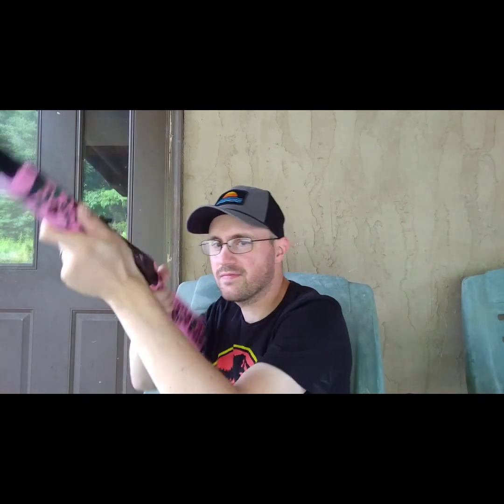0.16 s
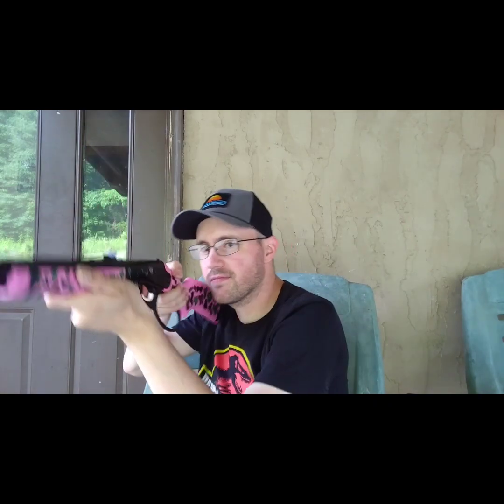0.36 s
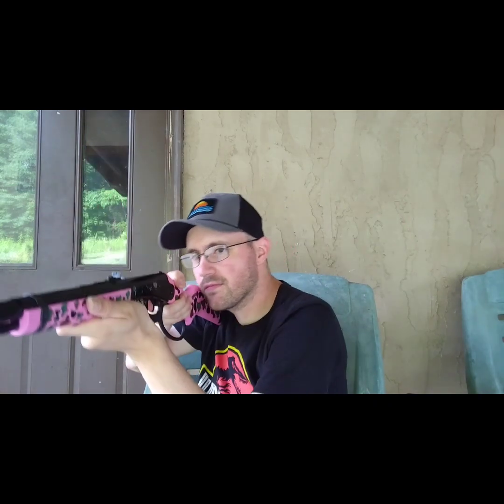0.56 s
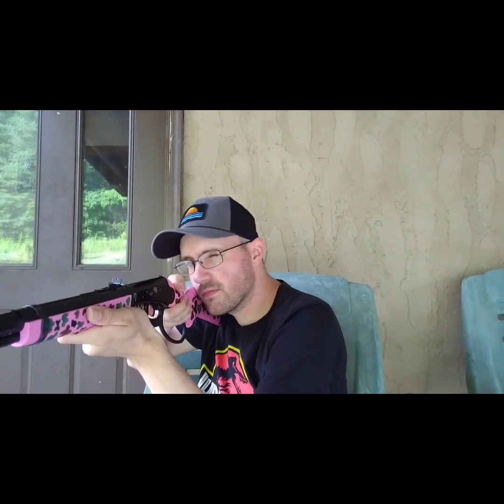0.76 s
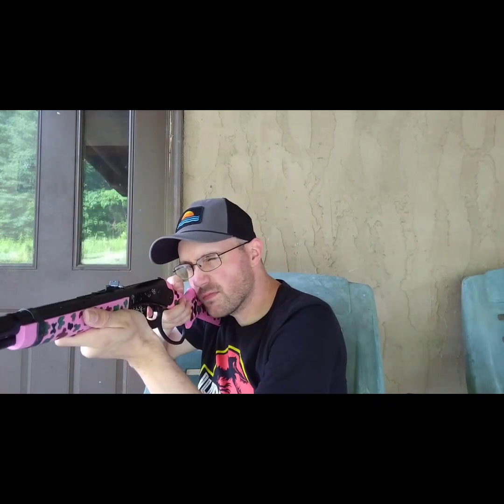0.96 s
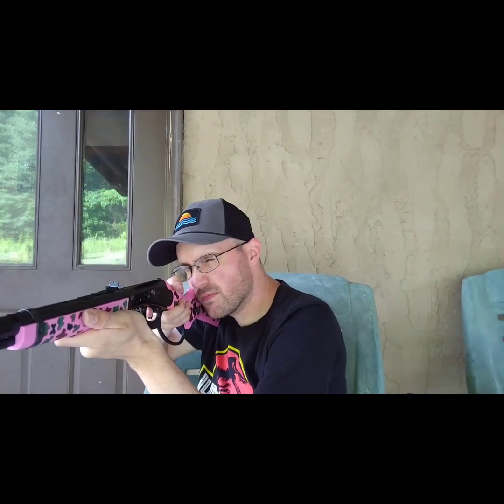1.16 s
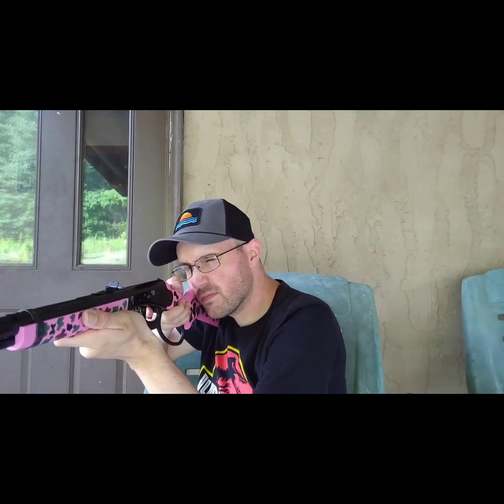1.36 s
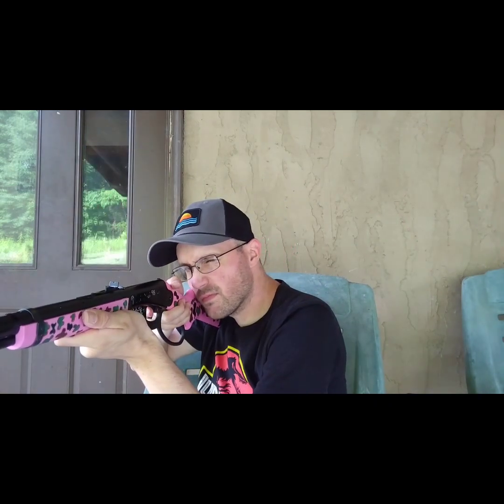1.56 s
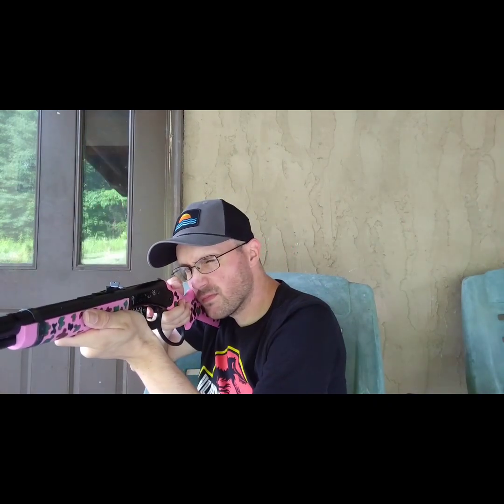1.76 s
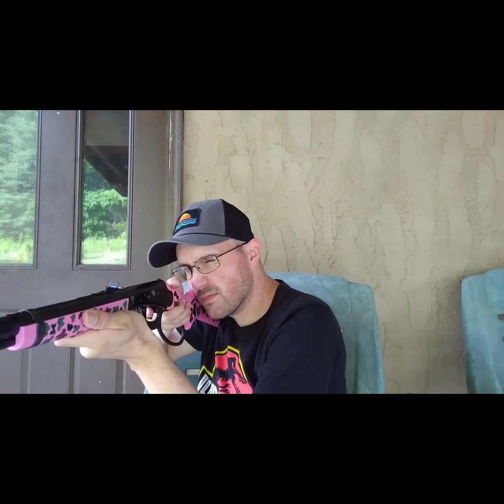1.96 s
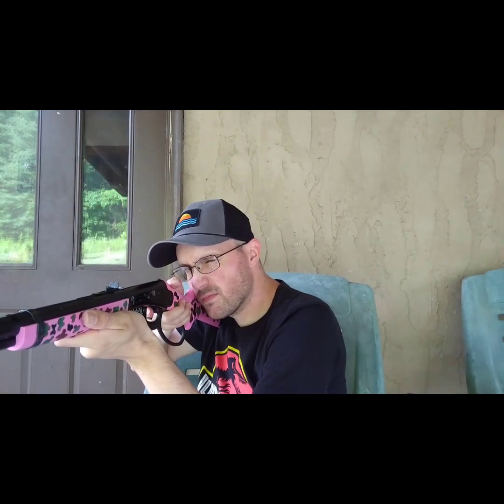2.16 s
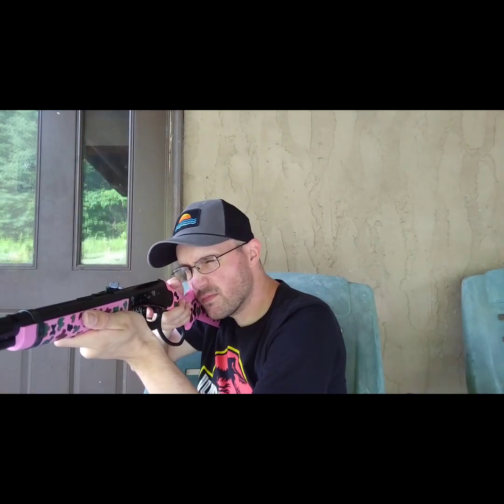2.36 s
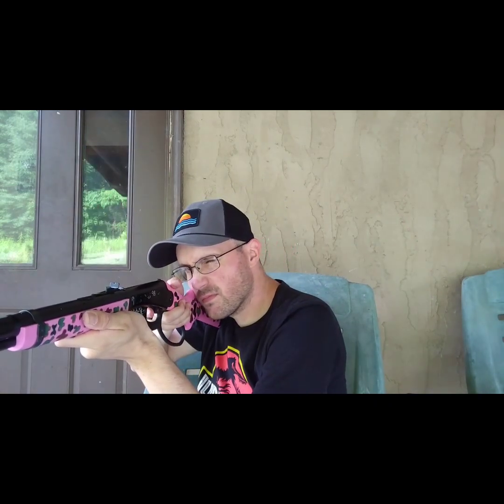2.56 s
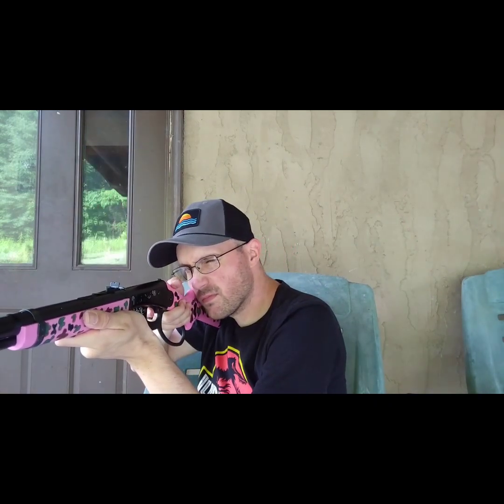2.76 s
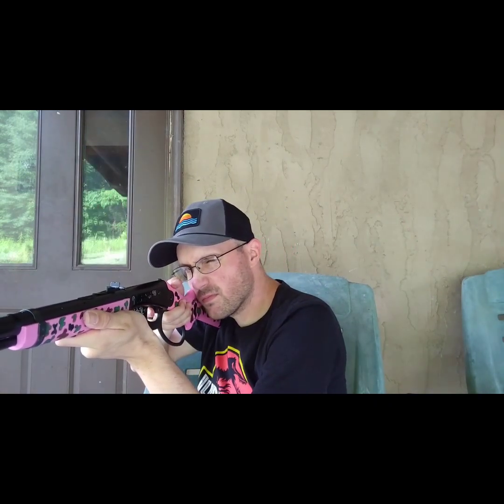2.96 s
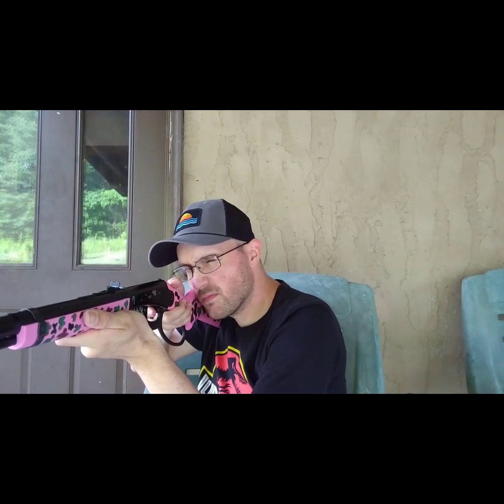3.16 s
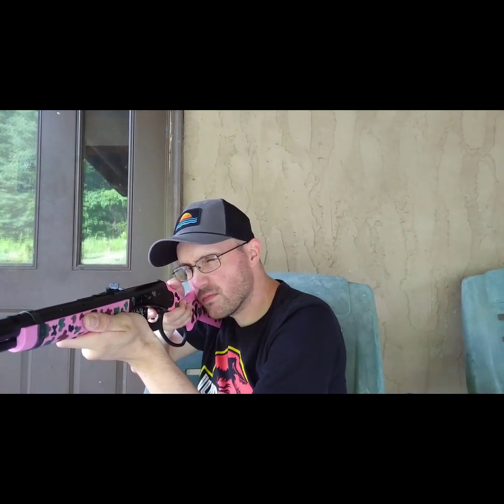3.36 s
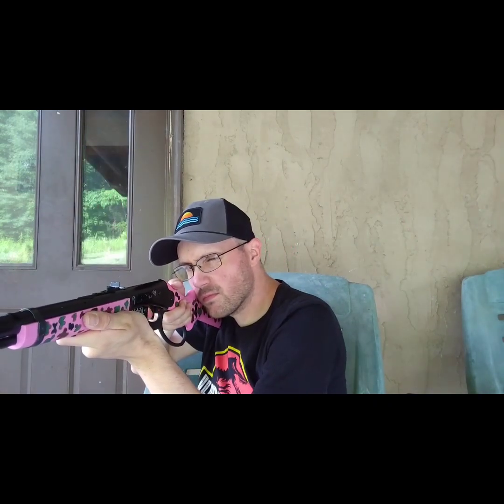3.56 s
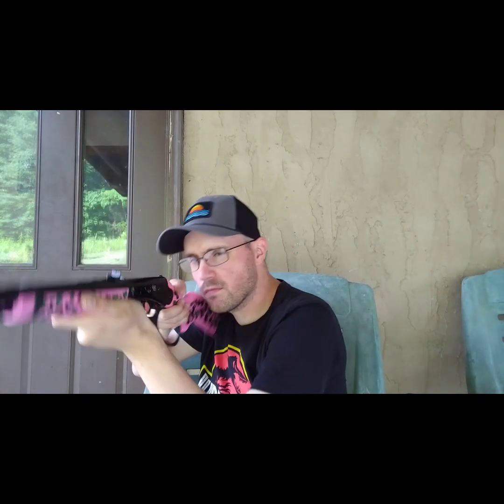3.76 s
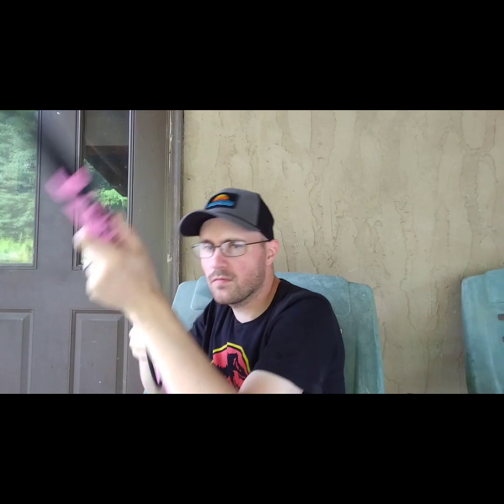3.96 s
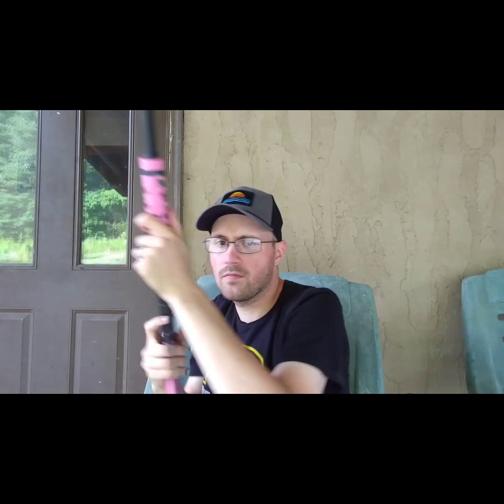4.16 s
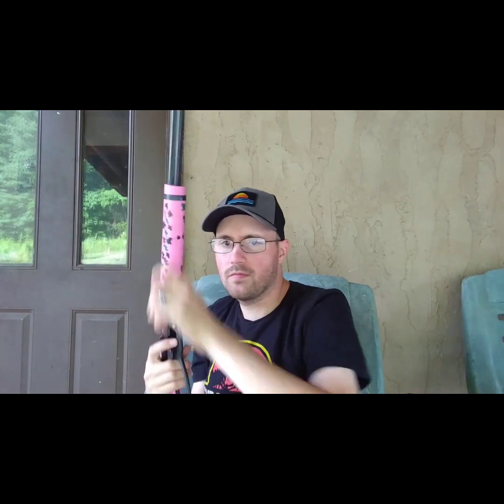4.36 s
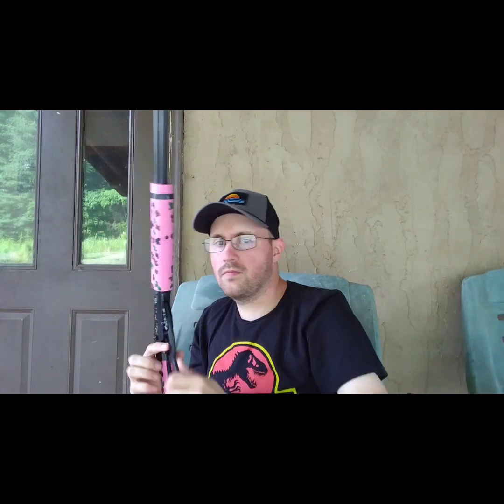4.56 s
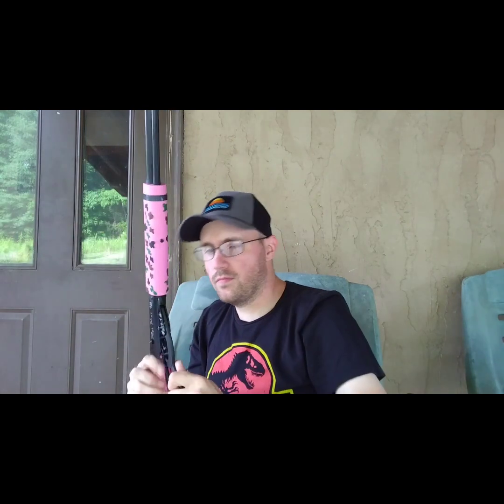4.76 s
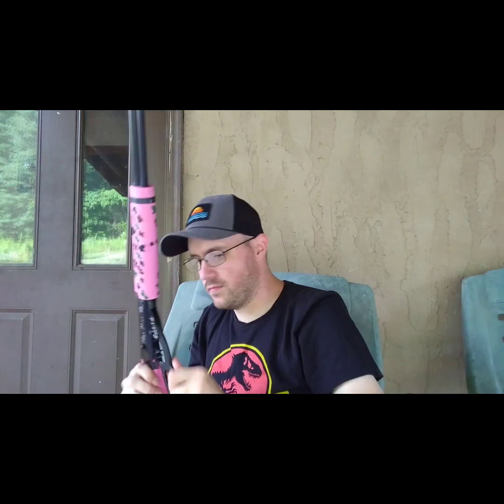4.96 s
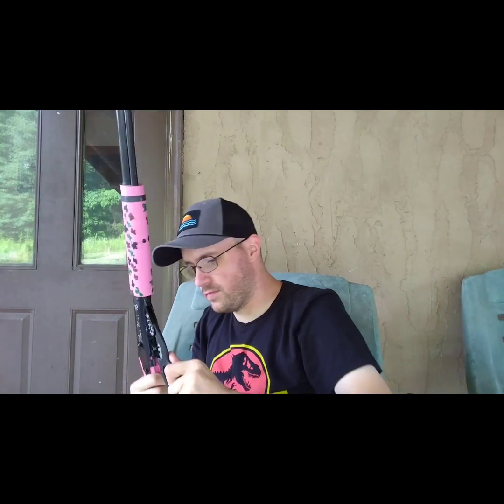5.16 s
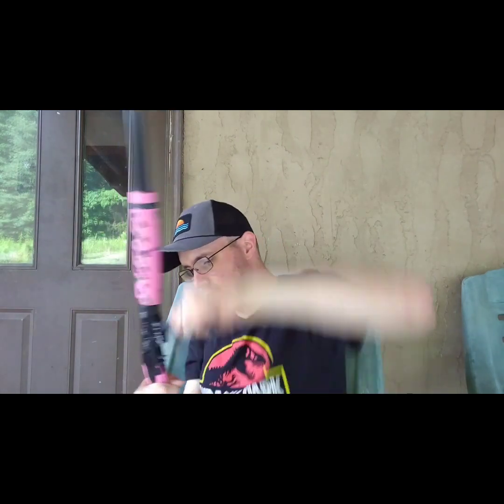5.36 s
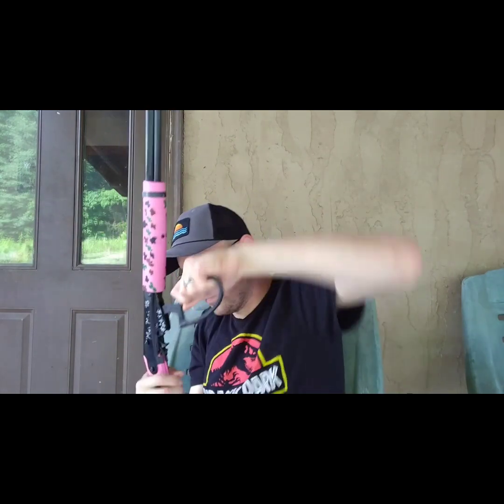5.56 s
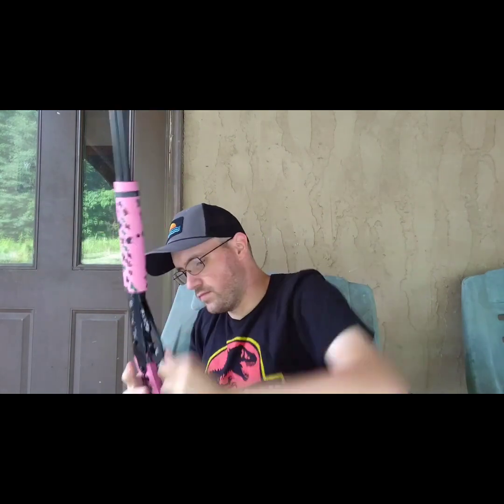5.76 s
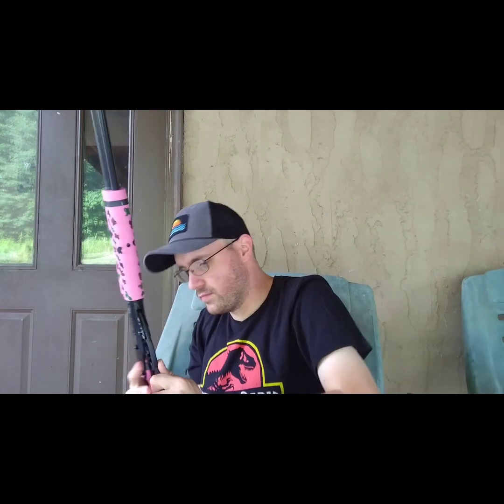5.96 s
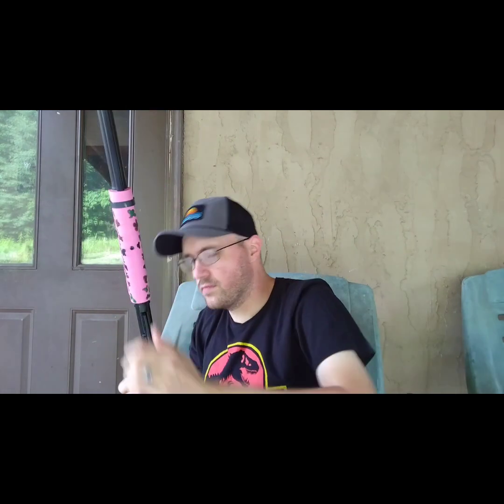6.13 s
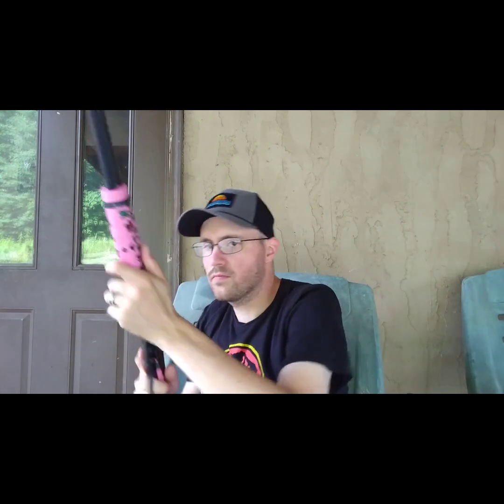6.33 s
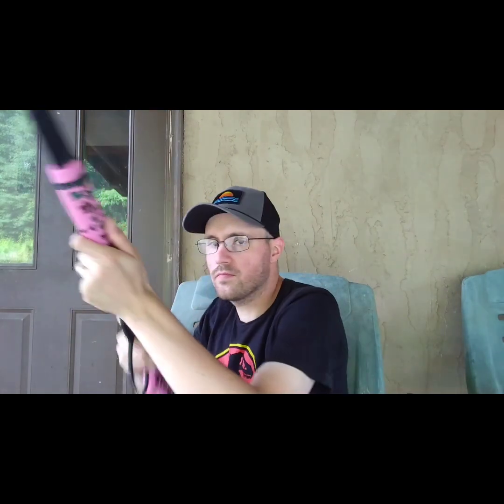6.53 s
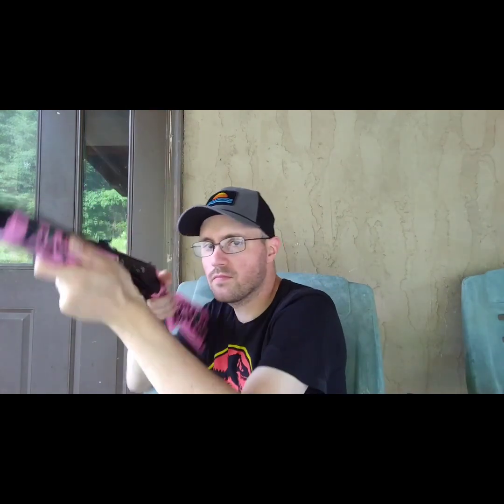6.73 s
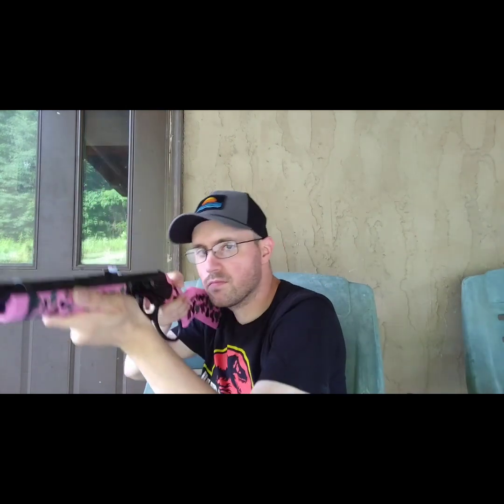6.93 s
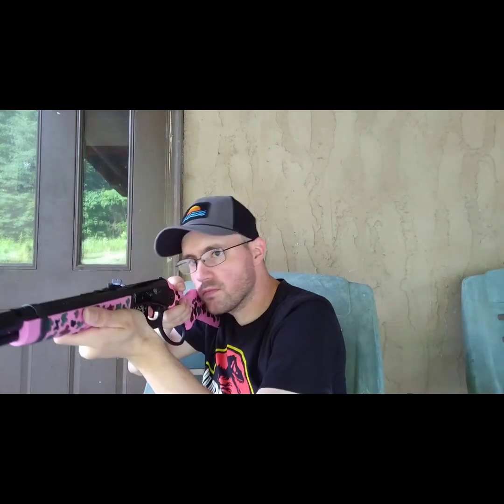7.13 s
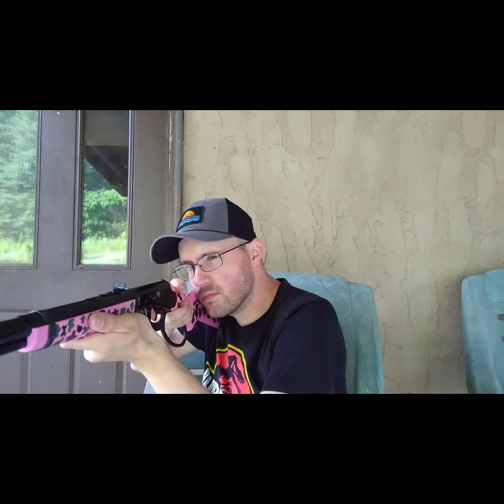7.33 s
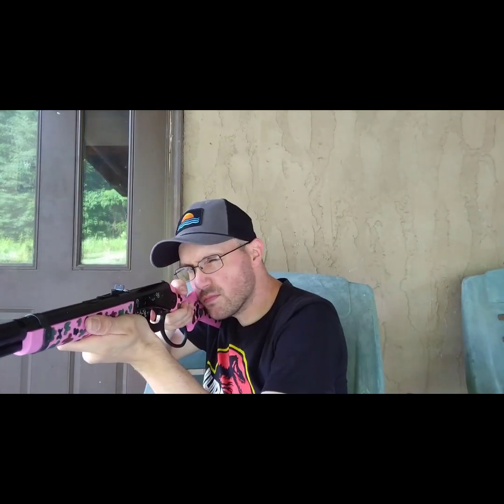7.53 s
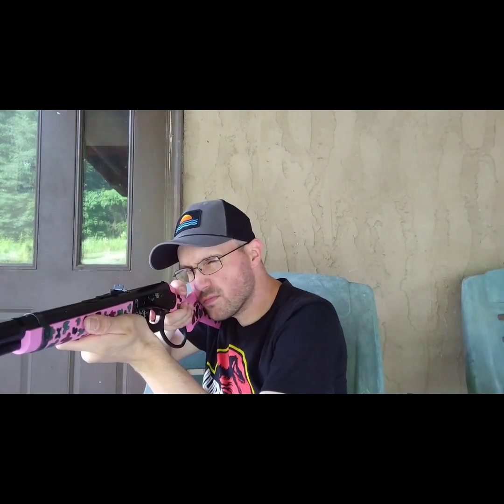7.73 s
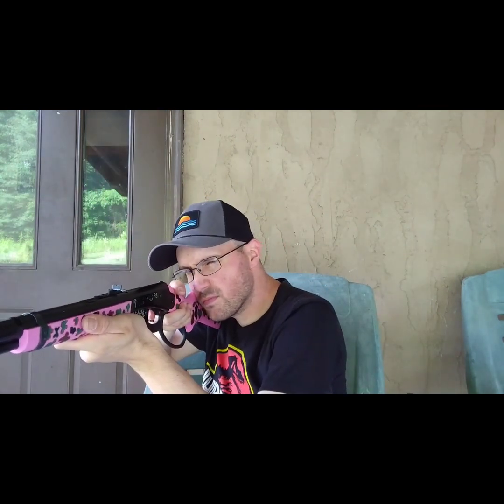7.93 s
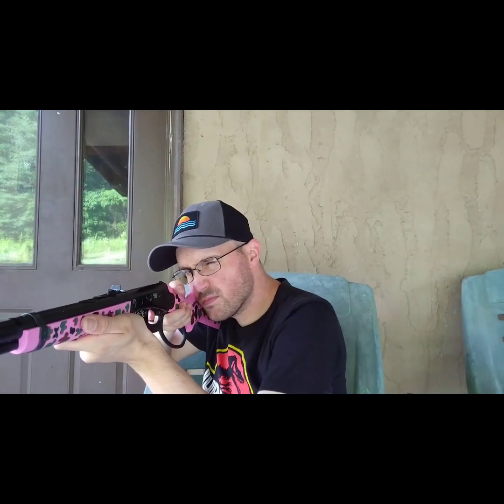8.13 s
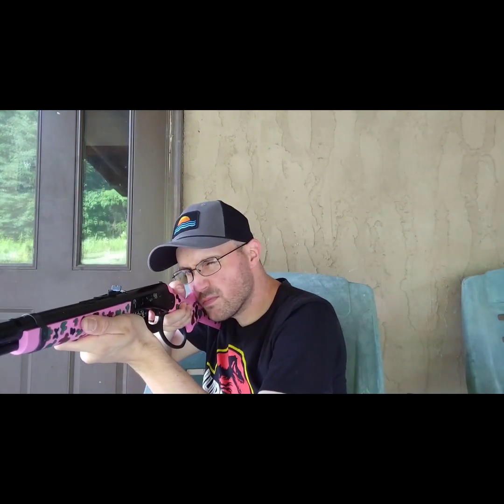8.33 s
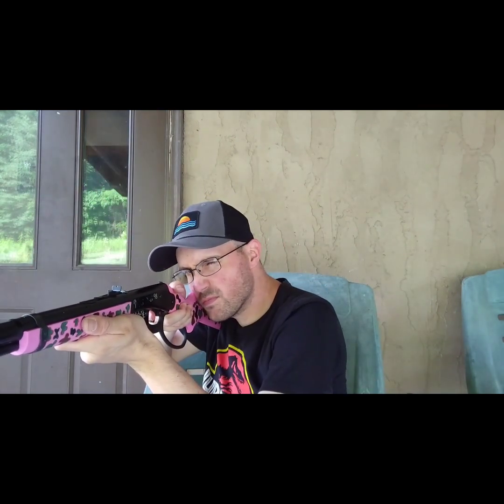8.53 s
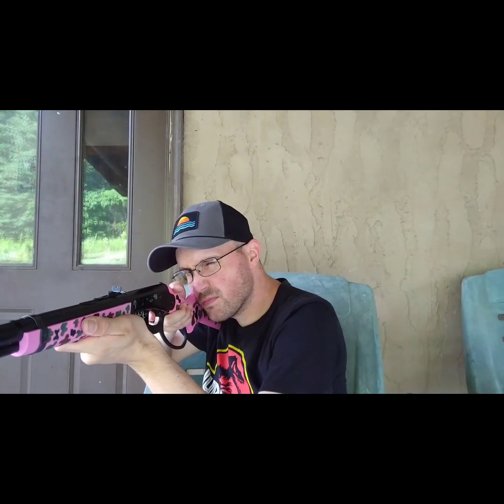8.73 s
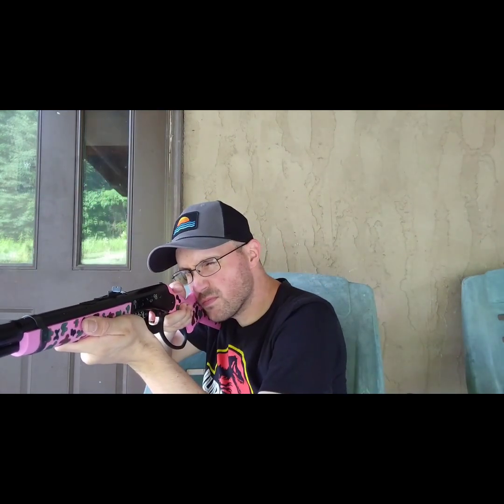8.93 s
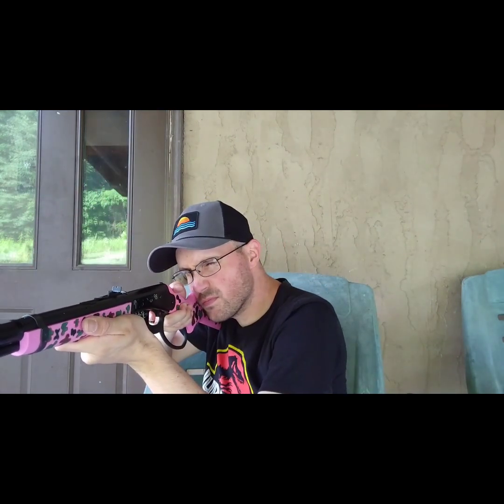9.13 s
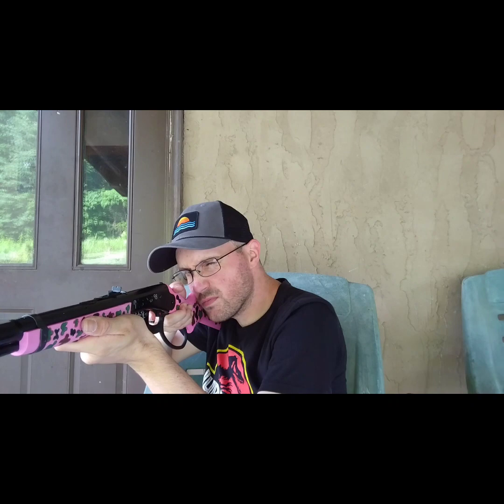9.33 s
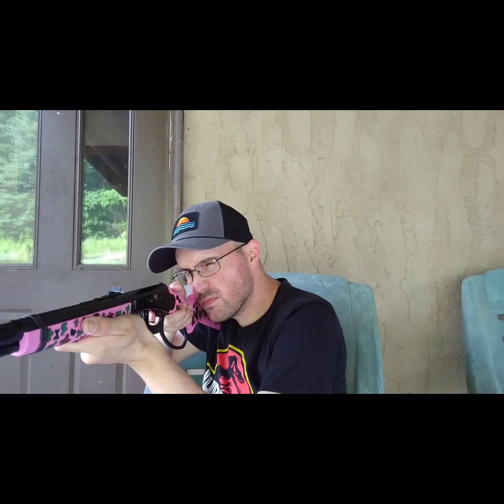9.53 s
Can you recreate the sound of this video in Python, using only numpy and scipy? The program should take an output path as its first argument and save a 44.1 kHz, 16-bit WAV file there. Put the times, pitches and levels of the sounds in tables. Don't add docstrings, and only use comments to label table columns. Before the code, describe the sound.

Close on a porch, an air gun's loose pellets roll and tick, one sharp shot cracks, the lever clacks, and a bird whistles behind.

```python
import sys
import numpy as np
from scipy import signal
from scipy.fft import rfft, irfft
from scipy.io import wavfile

SR = 44100
rng = np.random.default_rng(int(sys.argv[2]) if len(sys.argv) > 2 else 0)


def gain_from_db(level_db):
    decades = np.asarray(level_db, float) / 20
    return 10 ** decades


def waveform_to_disk(signal):
    frames = np.transpose(np.atleast_2d(signal))
    scaled = np.clip(frames, -1, 1) * 32767
    samples = np.round(scaled).astype(np.int16)
    wavfile.write(sys.argv[1], SR, samples)


N = 427329

# (frequency [Hz], level [dB per Hz])
MAGAZINE = [(290, -51.5), (500, -25), (706, -9.5), (786, -17), (1000, -9.5), (1430, -2.5), (1970, -1.5),
            (4520, -0.5), (6160, -4.5), (7460, -3.5), (8600, -23), (11200, -59.5), (18900, -120)]
# (frequency [Hz], level [dB per Hz])
GUN_BODY = [(180, -46), (300, -14), (484, -20), (727, -6.5), (990, -11), (2680, -0.5), (2960, -6),
            (7370, -10.5), (8600, -35.5), (11200, -58), (18900, -120)]


def pellets():
    # (frequency [Hz], width [Hz], level [dB])
    tube_modes = [(1422, 59, -2), (1690, 120, -5), (2700, 200, -5.5), (4000, 420, -5.5), (4570, 110, -3.5),
                  (7390, 580, -6)]
    # (start [s], rise [s], hold [s], dying t60 [s], level [dB])
    slides = [(.2, 0.096, 0.12, 0.6, -57), (3.575, .008, 0.014, 0.28, -64.5),
              (4.17, 0.07, 0.062, 0.75, -63.5), (2.32, 0.026, 0.024, 0.37, -69),
              (5.5, 0.027, .05, 0.4, -60), (5.58, .03, .09, .35, -65), (5.34, .025, .01, .05, -58),
              (5.915, 0.0051, 0.032, 0.067, -51.5), (5.95, 0.025, 0.0057, 0.5, -66.5),
              (6.31, 0.052, 0.06, .3, -81), (6.78, 0.068, 0.14, .22, -54.5)]
    # (start [s], rise [s], hold [s], dying t60 [s], level [dB])
    pile_ups = [
        (4.33, .002, .02, 0.085, -49.5),
        (4.325, 0.044, 0.026, .17, -36),
        (4.42, 0.016, 0.01, .05, -53),
        (5.362, 0.036, 0.086, 0.14, -41.5),
    ]
    # (start [s], end [s], level at start [dB], level at end [dB])
    trickles = [
        (.5, 1.14, -66.5, -59.5),
        (1.14, 2.34, -61.5, -62.5),
        (3.68, 3.88, -74, -75.5),
        (7., 8.04, -61, -65),
        (8.04, 9.3, -67, -61.5),
        (9.3, 9.58, -60.5, -66.5),
        (9.58, 9.8, -73, -72.5),
    ]
    # (time [s], level [dB])
    clump_table = [(.62, -67), (.72, -66), (.85, -69), (1.14, -67), (1.32, -63), (1.639, -63), (1.71, -66),
                   (2.46, -69), (3.676, -67), (5.552, -60), (5.615, -66), (5.672, -68), (5.725, -67),
                   (6.422, -73), (6.978, -60), (7.05, -65), (7.22, -61), (7.33, -57.5), (7.45, -64),
                   (7.54, -62), (7.63, -65), (8.47, -74)]
    rise_s, clump_t60_s = 0.019, 0.092
    clumps = swells([(s - rise_s, rise_s, 0, clump_t60_s, db) for s, db in clump_table])
    trickle = ramps(trickles, 0.063) * gain_from_db(0.83 * drift(8))

    born = rng.random(N) < 3000 * gain_from_db(2.5 * drift(25)) / SR
    strength = gain_from_db(2.94 * np.minimum(rng.exponential(1, N), 5))
    ticks = rms_one(born * strength * rng.choice([-1, 1], N))
    ticks = ticks + .5 * rng.standard_normal(N)
    rung = ticks + sum(gain_from_db(db + 2.3 * drift(3)) * resonate(ticks, hz, width) for hz, width, db in tube_modes)
    tube = rms_one(colour(rung, MAGAZINE))

    hum = rng.standard_normal(N)
    hum = hum + sum(gain_from_db(db + 1.0 + 2.4 * drift(2.5)) * resonate(hum, hz, width) for hz, width, db in tube_modes)
    blur = rms_one(tube + 1.11 * rms_one(colour(hum, MAGAZINE)))

    # (envelope, texture, boost of its lower rattle [dB])
    motions = [(swells(slides), tube, 4.5), (swells(pile_ups), blur, -1), (trickle, blur, 0.1), (clumps, tube, -5)]
    lower = signal.butter(2, [1000, 3900], "band", fs=SR, output="sos")
    out = np.zeros(N)
    for flow, texture, fill_db in motions:
        out += flow * (texture + (gain_from_db(fill_db) - 1) * signal.sosfilt(lower, texture))
    return gain_from_db(4.5) * out


def single_pellets():
    # (time [s], peak level [dB], centre [Hz])
    strikes = [(0.203, -45.5, 2460), (0.2257, -37.5, 2420), (0.2566, -34, 2670), (0.2921, -31.5, 3270),
               (0.314, -34, 2940), (0.3481, -33.5, 3310), (0.395, -34, 3020), (0.4627, -30.5, 3250),
               (0.4975, -32, 2950), (0.5517, -47, 1790), (0.723, -36, 3330), (0.8612, -34, 2510),
               (1.158, -36.5, 3000), (1.3155, -39, 4550), (1.636, -35, 3800), (1.704, -34.5, 2380),
               (2.4573, -55, 5830), (4.2287, -40, 2370), (4.2502, -39, 4010), (4.3377, -34, 4250),
               (4.3737, -22, 3000), (6.42, -50, 2880), (6.5096, -52.5, 2810), (6.783, -44.5, 2240),
               (6.805, -44, 2940), (6.8781, -31.5, 2160), (6.8903, -30, 3370), (6.978, -35, 7360),
               (7.0556, -32.5, 4410), (7.3398, -31.5, 3860), (8.4434, -40, 4000), (8.4744, -38, 3650),
               (9.5776, -43, 4830),
               (0.617, -42, 3840), (0.7734, -46, 3500), (0.8001, -42, 4420), (0.835, -39, 2440),
              (0.9617, -40, 2730), (0.9774, -43, 3000), (1.0342, -40.5, 2890), (1.131, -39, 4340),
              (1.144, -39, 4160), (1.1647, -39, 3990), (1.1956, -41, 4430), (1.2266, -42, 4930),
              (1.2344, -39, 4170), (1.2684, -44, 4580), (1.304, -42, 4680), (1.3254, -40, 1700),
              (1.377, -44, 3360), (1.4597, -45, 4690), (1.4784, -45, 4390), (1.5734, -48, 4570),
              (2.337, -45, 4560), (6.8384, -37, 2920), (6.8518, -36, 2440), (6.912, -33, 2140),
              (6.9411, -31, 2130), (7.012, -41, 1780), (7.0467, -39, 4520), (7.0674, -39, 4460),
              (7.2225, -38, 2080), (7.2384, -39, 4490), (7.3208, -38, 4510), (7.3644, -40, 4550),
              (7.3911, -43, 2450), (7.445, -38.5, 2510), (7.4664, -39, 3170), (7.54, -40, 4100),
              (7.6241, -37.5, 2750), (7.6444, -44, 2750), (7.6614, -45, 4170), (8.0062, -48, 3740),
              (8.5598, -40, 2720)]
    t60_s = 0.024
    return gain_from_db(-3.0) * knocks([(*row, t60_s) for row in strikes], MAGAZINE, 0.62, 0.0065)


def shot():
    # (start [s], rise [s], hold [s], dying t60 [s], level [dB])
    spring = [
        (3.2698, .003, 0.002, .022, -19),
        (3.277, 0.0015, .0005, .025, -24),
        (3.272, 0.0069, 0.03, 0.18, -26.5),
        (3.28, 0.017, .03, 0.61, -35.5),
    ]
    # (frequency [Hz], level [dB per Hz])
    blast = [(47, -39), (80, -6.5), (136, -1), (249, -13), (368, -4.5), (431, -7), (702, -11.5), (961, -10),
             (1450, -9.5), (1660, -6.5), (2660, -2.5), (7500, -15), (8600, -41), (11200, -66.5),
             (18900, -120)]
    # (frequency [Hz], level [dB], t60 [s])
    boards = [(129, 5, .045), (143, .5, 0.6), (274, -15, 0.4), (320, -3, .1), (375, 4, 0.46),
              (470, -14, 0.35), (792, -8, 0.18), (967, 5, 0.2), (1064, -4, 0.14)]
    pop_s, pop_db, pop_hz, suck_width_s = 3.2798, -5.3, 2750, .000075
    out = swells(spring) * gain_from_db(1.8 * drift(150)) * colour(rng.standard_normal(N), blast)
    t = np.arange(SR) / SR
    swell, late = t / .0005, t - .00038
    suck = np.exp(-.5 * (late / suck_width_s) ** 2)
    burst = np.cos(2 * np.pi * pop_hz * late) * swell ** .5 * np.exp(.5 - swell ** 2 / 2)
    add(out, pop_s, -gain_from_db(pop_db) * (burst + suck))
    for hz, db, t60 in boards:
        add(out, pop_s - .003, gain_from_db(db - 32.5) * np.sin(2 * np.pi * hz * t) * dying(t, t60))
    return signal.sosfilt(signal.butter(2, 70, "high", fs=SR, output="sos"), out)


def lever():
    # (time [s], peak level [dB], centre [Hz], t60 [s])
    teeth = [(5.364, -38, 3500, .03), (5.369, -25.5, 3500, 0.07), (5.3865, -19, 3370, 0.041),
             (5.4015, -20, 2090, 0.06), (5.403, -26, 7000, 0.036), (5.4175, -17, 2750, .04),
             (5.435, -17, 2230, .03), (5.4385, -22, 2800, .02), (5.476, -18, 2200, 0.03),
             (5.478, -30.5, 806, .012), (5.488, -27, 4100, 0.037), (5.436, -27, 900, .02),
             (5.462, -28, 4000, .03)]
    return gain_from_db(0.5) * knocks(teeth, GUN_BODY, 0.7, 0.003)


def slap():
    # (time [s], peak level [dB], centre [Hz], t60 [s])
    blows = [
        (5.861, -44, 6480, .02),
        (5.8655, -35.5, 3900, 0.035),
        (5.8795, -21, 6590, .014),
        (5.8802, -16, 2300, 0.018),
        (5.8817, -7, 4580, 0.016),
        (5.8885, -20, 4630, 0.098),
        (5.882, -32, 620, .04),
        (5.889, -30., 1100, .06),
        (5.892, -26.5, 3200, 0.11),
        (5.948, -39.5, 3500, 0.028),
    ]
    # (frequency [Hz], level [dB per Hz])
    receiver = [(180, -50), (300, -28), (365, -21), (949, -18.5), (1810, -3), (2720, -7.5), (4320, 0.5),
                (7580, -14.5), (8600, -37.5), (11200, -68), (18900, -120)]
    return knocks(blows, receiver, 1.3, 0.0037)


def metal_rings():
    # (start [s], frequency [Hz], t60 [s], level [dB])
    tones = [(5.403, 2100, 0.086, -34), (5.42, 2700, .09, -36), (5.477, 4100, 0.062, -36),
             (5.48, 1353, .06, -42), (5.524, 1345, .04, -45), (5.549, 1410, 0.045, -36),
             (3.2712, 2600, .02, -15), (3.285, 2450, .05, -22), (3.294, 1950, .04, -22),
             (3.35, 7500, .2, -46), (5.888, 4290, .1, -33.5), (5.879, 2400, .02, -18),
             (5.881, 1500, .02, -22), (5.8645, 3900, .02, -32), (5.888, 1900, .07, -27),
             (5.366, 3500, .04, -36), (5.9, 1750, .05, -31), (5.914, 2590, 0.043, -34),
             (4.368, 4320, 0.04, -30), (4.345, 7010, .2, -40.5)]
    out, t, shake = np.zeros(N), np.arange(SR // 4) / SR, gain_from_db(3 * drift(120))
    for s, hz, t60, db in tones:
        add(out, s, gain_from_db(db) * np.clip(t / .002, 0, 1) * dying(t, t60) * np.sin(2 * np.pi * hz * t))
    return out * shake


def hands():
    # (time [s], peak level [dB], centre [Hz], t60 [s])
    taps = [(4.773, -53, 2120, 0.042), (4.81, -57, 2940, 0.042), (5.034, -49, 1593, 0.055),
            (5.05, -44, 1270, 0.035), (5.321, -52, 1090, 0.042), (5.5485, -36, 1400, 0.03),
            (5.612, -48, 3600, .03), (5.716, -55, 1670, .03), (5.732, -51, 3500, .03),
            (6.306, -51.5, 2005, 0.057)]
    return gain_from_db(1.0) * knocks(taps, GUN_BODY, 2.0, 0.0098)


def grip():
    # (start [s], rise [s], hold [s], dying t60 [s], level [dB])
    rubs = [(4.225, 0.022, 0.027, .15, -62), (4.18, .03, 0.045, .08, -58), (4.19, 0.055, .08, .1, -55.5),
            (4.23, .04, .06, .05, -59)]
    # (frequency [Hz], width [Hz])
    shroud = [(1500, 250), (2250, 300), (4000, 450), (7000, 230)]
    # (start [s], rise [s], hold [s], dying t60 [s], level [dB])
    thuds = [
        (4.34, .04, .06, .3, -66.5),
        (5.4, 0.037, 0.074, .25, -61),
        (5.88, .005, .02, .2, -66.5),
        (6.86, .06, .08, .4, -69),
    ]
    skin = rng.standard_normal(N) * gain_from_db(2.5 * drift(40))
    rub = sum(swells([row]) * rms_one(resonate(skin, hz, width)) for row, (hz, width) in zip(rubs, shroud))
    band = signal.butter(2, [70, 220], "band", fs=SR, output="sos")
    dull = rms_one(signal.sosfilt(band, rng.standard_normal(N)))
    return rub + swells(thuds) * dull


def can():
    # (frequency [Hz], level [dB], t60 [s])
    modes = [(4655, 1, 0.21), (4680, -7., .16), (2980, -8.5, 0.14), (6220, -16, .5), (6230, -20, .4),
             (6860, -22, 0.34), (7542, -35, .12)]
    signs = [1, -1, 1, 1, -1, 1, 1]
    damped_db = [-24, -24, -20, -11, -15, -14, -10]
    # (time [s], peak level [dB], ring of the can [dB])
    bounces = [(3.387, -37, -23), (3.4221, -44, -29), (3.403, -41, -30), (3.414, -41, -30),
               (3.4353, -38, -27), (3.448, -36, -30), (3.496, -48, -30), (3.517, -53, -30),
               (3.5444, -54, -13), (3.5658, -52, -25), (3.5793, -48.5, -25.5), (3.599, -40.5, -27),
               (3.6244, -50, -21), (3.676, -46, -27), (3.7627, -51.5, -26.5)]
    main_s, main_db, lands_s = 3.4355, -26.5, 3.512
    out, t = np.zeros(N), np.arange(SR // 2) / SR
    landed = np.clip((t - lands_s + main_s) / 0.0051, 0, 1)
    tones = [sign * gain_from_db(db) * np.sin(2 * np.pi * hz * t) * dying(t, t60)
             for sign, (hz, db, t60) in zip(signs, modes)]
    damped = sum(tone * gain_from_db(db * landed) for tone, db in zip(tones, damped_db))
    add(out, main_s, gain_from_db(main_db) * damped * np.clip(t / 0.003, 0, 1))
    bright = signal.butter(1, [2000, 6000], "band", fs=SR, output="sos")
    for s, db, ring_db in bounces:
        tick = signal.sosfilt(bright, rng.standard_normal(len(t)) * dying(t, 0.0082))
        add(out, s, gain_from_db(db + 4.5) * (tick / np.abs(tick).max() + gain_from_db(ring_db) * sum(tones)))
    return out


def bird():
    # (time [s], level [dB], upper notes relative [dB], upper notes late by [s], closing notes relative [dB])
    song = [(2.698, -49.5, 0, 0.0054, 0), (3.085, -42, -1.5, 0.002, 1), (3.475, -39, 2.5, 0, 0),
            (3.862, -45, 5.5, .0, 1), (8.113, -42, -13, 0.001, -4.5), (8.497, -42.5, 0.5, .003, -2),
            (8.884, -43.5, 5, 0.0019, -3), (9.278, -44.5, 3, 0, -3)]
    # (time from the low whistle [s], length [s], level [dB], lateness of peak [0-2])
    whistles = [(-.128, .022, -25, .8), (-.12, .06, -9.5, 1.2), (-.094, .032, -6.5, 1.5),
                (-.062, .03, -6, .8), (-.005, .058, 0, 1.4), (.068, .028, -5., .8), (.112, .055, -7, 1.6),
                (.172, .018, -16., .8), (.174, .02, -12, .7)]
    # (start [Hz], middle [Hz], end [Hz], buzz [0-1])
    glides = [(4200, 4750, 5000, 0.5), (3570, 3650, 3640, 0.3), (3600, 3320, 3200, .4),
              (3900, 4080, 4330, .5), (2610, 2725, 2750, .1), (3200, 2980, 2900, .45),
              (2390, 2440, 2480, .15), (2200, 2010, 1900, 0.6), (2470, 2450, 2440, .3)]
    # (time [s], length [s], frequency [Hz], level [dB])
    held_tones = [(.003, .165, 2460, -70.), (.003, .08, 2750, -74.), (6.332, .09, 2200, -69.),
                  (3.56, .4, 1400, -74.)]
    out, buzz = np.zeros(N), drift(190)
    for start, phrase_db, upper_db, late, closing_db in song:
        for (s, length, db, lean), (hz0, hz1, hz2, rough) in zip(whistles, glides):
            upper, closing = s < 0, .1 < s < .15
            u = np.linspace(0, 1, round(length * SR))
            at = start + s + late * upper
            pitch = np.interp(u, [0, .5, 1], [hz0, hz1, hz2]) * (1 + rng.normal(0, .0005))
            note_db = phrase_db + db + upper_db * upper + closing_db * closing + rng.normal(0, .4)
            level = gain_from_db(note_db) * np.sin(np.pi * u ** np.clip(lean, .2, 3)) ** 0.99
            level = level * (1 + rough * buzz[round(at * SR):][:len(u)])
            add(out, at, level * np.sin(2 * np.pi * np.cumsum(pitch) / SR))
    leafy = signal.sosfilt(signal.butter(2, 3400, "high", fs=SR, output="sos"), out)
    out = out + gain_from_db(-7) * echoes(leafy, 0.4, .02, 7000) + gain_from_db(-18) * echoes(out, .55, 0.09, 2600)
    waver = drift(15)
    for s, length, hz, db in held_tones:
        t = np.arange(round(length * SR)) / SR
        fade = np.clip(np.minimum(t, length - t) / 0.016, 0, 1)
        fade = fade * gain_from_db(1.5 * waver[round(s * SR):][:len(t)])
        add(out, s, gain_from_db(db) * fade * np.sin(2 * np.pi * hz * t + 1.4 * waver[:len(t)]))
    return out


def cricket():
    # (start [s], end [s], level at start [dB], level at end [dB])
    chirping = [
        (0, 3., -87, -81),
        (4.1, 6.2, -85, -87),
        (6.2, 9.69, -91, -88),
    ]
    tone_hz, strokes_hz = 5790, 48.7
    t = np.arange(N) / SR
    strokes = np.clip(np.sin(2 * np.pi * (strokes_hz * t + .3 + .06 * drift(10))) + 0.5, 0, 1)
    tone = np.sin(2 * np.pi * tone_hz * t + 1.5 * drift(13))
    return gain_from_db(3.5 + 2.0 * drift(8)) * ramps(chirping, .05) * strokes * tone


def background():
    # (frequency [Hz], level [dB per Hz])
    air = [(15, -40.), (25, -25.), (40, -8.5), (62, -2), (95, 2.5), (160, -5.5), (300, -12.5), (630, -15),
           (1000, -14), (2000, -17), (3200, -17.), (5000, -25), (7500, -27), (8600, -40.5)]
    # (loudest [s], spread [s],
    # frequency [Hz], level [dB])
    drones = [(.2, .6, 89.16, -67), (1.6, .7, 87.56, -64), (3.4, .25, 87.2, -62.5), (4.4, .5, 84, -71),
              (5.7, .6, 109, -72.5), (7.1, .5, 110.1, -74.5), (7.8, .4, 82.3, -76),
              (8.699, 0.54, 98.3, -73.5)]
    # (loudest [s], spread [s], level [dB])
    tyre_passes = [
        (4., .6, -79),
        (5.8, .6, -75.5),
        (8.5, 0.68, -77.5),
    ]
    air_db, road_db = -67.5, -86.5
    t, waver = np.arange(N) / SR, 0.9 * drift(7.9)
    drone = sum(passing(s, spread, db) * np.sin(2 * np.pi * hz * t + waver) for s, spread, hz, db in drones)
    drone = drone * gain_from_db(2.6 * drift(7))
    band = signal.butter(2, [130, 420], "band", fs=SR, output="sos")
    rumble = rms_one(signal.sosfilt(band, rng.standard_normal(N)))
    tyres = gain_from_db(road_db) + sum(passing(*row) for row in tyre_passes)
    moving_air = gain_from_db(air_db + .6 * drift(2.2)) * colour(rng.standard_normal(N), air)
    return moving_air + drone + tyres * rumble


def knocks(table, body, ring_share, crack_s):
    out, t = np.zeros(N), np.arange(SR // 5) / SR
    for s, db, hz, t60 in table:
        noise = rng.standard_normal((2, len(t)))
        crack = colour(noise[0] * dying(t, crack_s), body)
        ring = resonate(noise[1] * dying(t, t60), hz, .25 * hz)
        hit = crack / np.abs(crack).max() + ring_share * ring / np.abs(ring).max()
        add(out, s, gain_from_db(db) * hit / np.abs(hit).max())
    return out


def swells(rows):
    out, t = np.zeros(N), np.arange(SR) / SR
    for s, rise, hold, t60, db in rows:
        rising = gain_from_db(db - 24 * np.clip(1 - t / rise, 0, 1))
        add(out, s, rising * dying(np.clip(t - rise - hold, 0, 1), t60))
    return out


def ramps(rows, edge_s):
    t, out = np.arange(N) / SR, np.zeros(N)
    for s0, s1, db0, db1 in rows:
        level = gain_from_db(np.interp(t, [s0, s1], [db0, db1]))
        out += level * np.clip(np.minimum(t - s0, s1 - t) / edge_s + .5, 0, 1)
    return out


def passing(s, spread, db):
    return gain_from_db(db) * np.exp(-.5 * ((np.arange(N) / SR - s) / spread) ** 2)


def echoes(x, t60, gap_s, cut_hz):
    t = np.arange(SR) / SR
    tail = rng.standard_normal(SR) * dying(t, t60) * np.clip(t / gap_s, 0, 1) ** 2
    tail = signal.sosfilt(signal.butter(1, cut_hz, fs=SR, output="sos"), tail)
    return signal.fftconvolve(x, tail / np.sqrt(np.sum(tail ** 2)))[:N]


def colour(x, spectrum):
    hz, db = np.transpose(spectrum)
    gain = gain_from_db(np.interp(np.log(np.fft.rfftfreq(8192, 1 / SR) + 1), np.log(hz), db))
    cepstrum = irfft(np.log(gain / np.sqrt(np.mean(gain ** 2))))
    cepstrum[1:4096] *= 2
    cepstrum[4097:] = 0
    return signal.fftconvolve(x, irfft(np.exp(rfft(cepstrum))))[:len(x)]


def resonate(x, hz, width_hz):
    r = np.exp(-np.pi * width_hz / SR)
    poles = [1, -2 * r * np.cos(2 * np.pi * hz / SR), r * r]
    return signal.lfilter((1 - r * r) / 2 * np.array([1, 0, -1]), poles, x)


def drift(rate):
    r = np.exp(-2 * np.pi * rate / SR)
    return rms_one(signal.lfilter([1], [1, -2 * r, r * r], rng.standard_normal(N + SR))[SR:])


def rms_one(x):
    return x / np.sqrt(np.mean(x ** 2) + 1e-20)


def dying(t, t60):
    return gain_from_db(-60 * t / t60)


def add(out, s, piece):
    i = max(round(s * SR), 0)
    out[i:i + len(piece)] += piece[:N - i]


def scene():
    hits = single_pellets() + hands() + lever() + slap() + metal_rings()
    porch = gain_from_db(-10.5) * echoes(hits, 0.16, 0.0067, 7500)
    gun = hits + porch + pellets() + shot() + grip()
    return (gun + can() + bird() + cricket() + background())[None]


def roll_off(x):
    return signal.sosfilt(signal.butter(12, 8880, fs=SR, output="sos"), x)


def record(dry):
    cut = signal.sosfiltfilt(signal.butter(14, 8070, fs=SR, output="sos"), dry)
    overloaded = np.clip(2.405 * np.tanh(cut / 2.395), -.99, .99)
    hiss = signal.sosfilt(signal.cheby2(12, 40, 15800, fs=SR, output="sos"), rng.standard_normal(dry.shape))
    return roll_off(overloaded + gain_from_db(-93.) * hiss)


dry = scene()
out = record(dry)
waveform_to_disk(out)
```